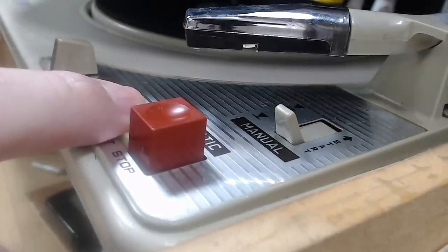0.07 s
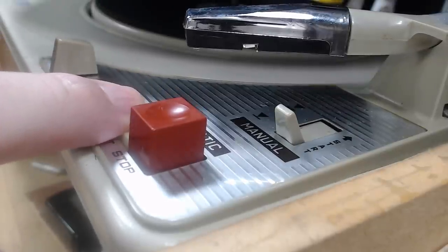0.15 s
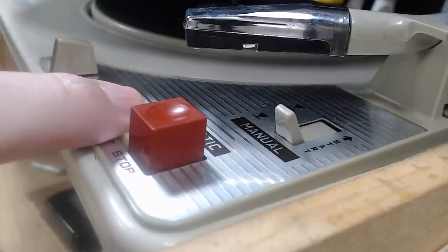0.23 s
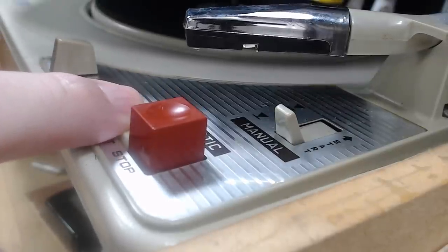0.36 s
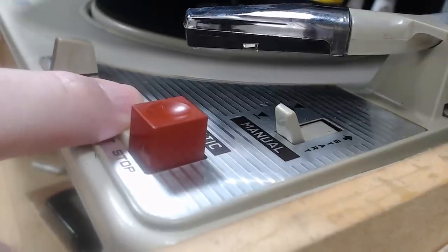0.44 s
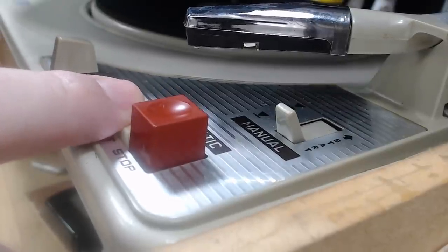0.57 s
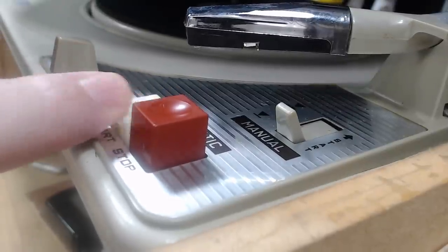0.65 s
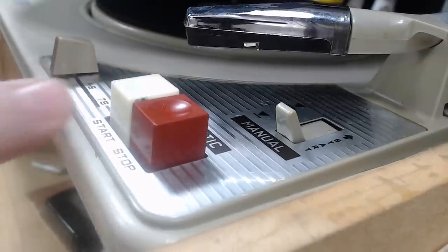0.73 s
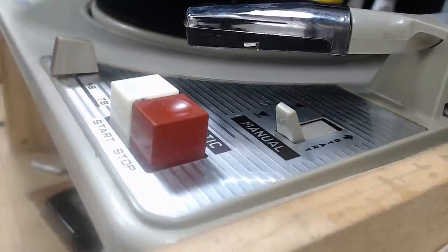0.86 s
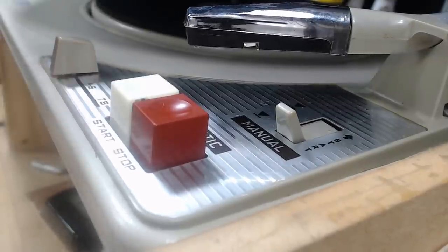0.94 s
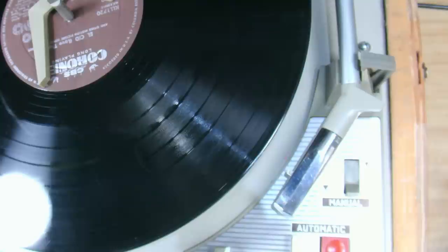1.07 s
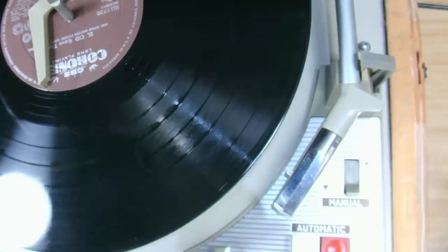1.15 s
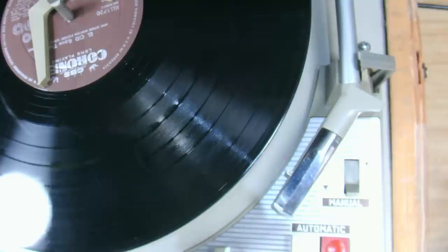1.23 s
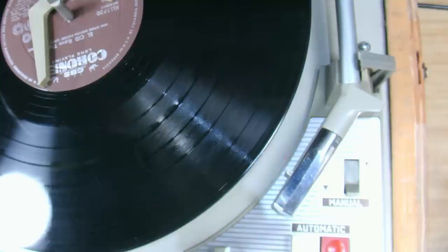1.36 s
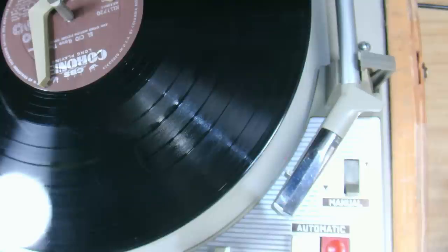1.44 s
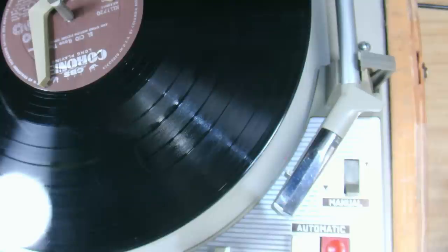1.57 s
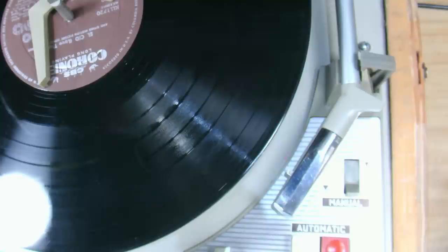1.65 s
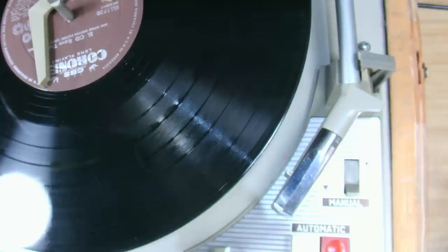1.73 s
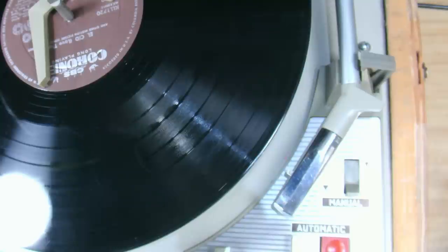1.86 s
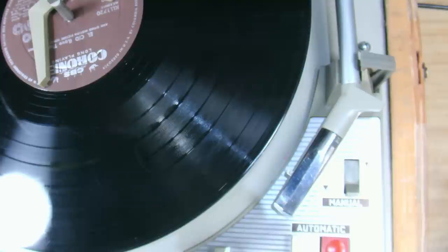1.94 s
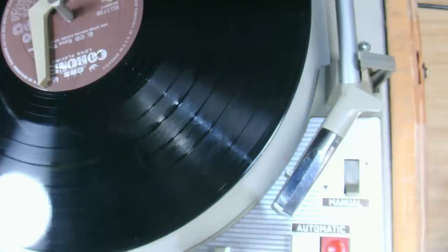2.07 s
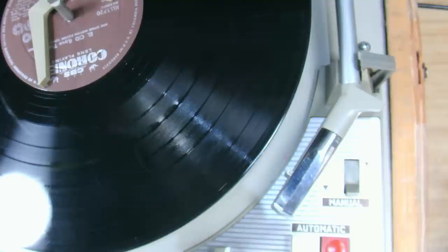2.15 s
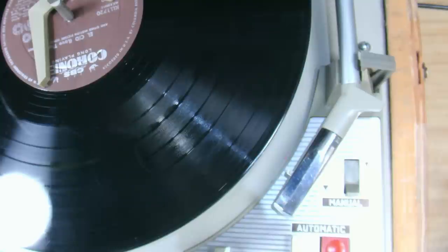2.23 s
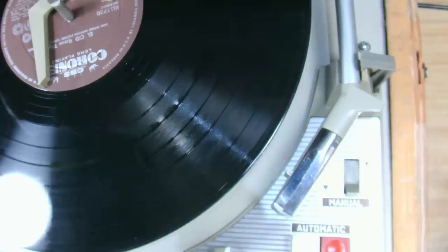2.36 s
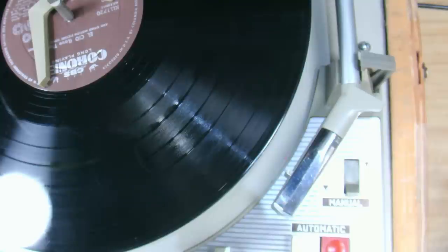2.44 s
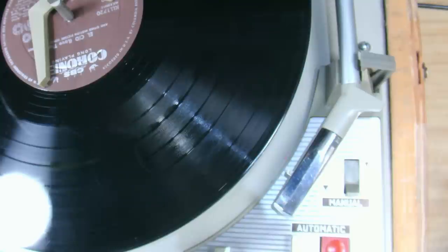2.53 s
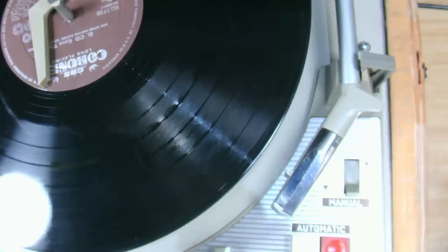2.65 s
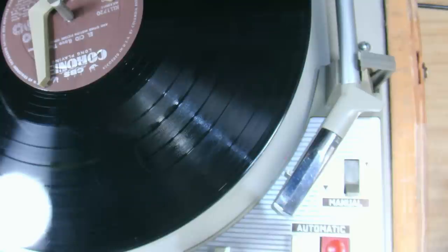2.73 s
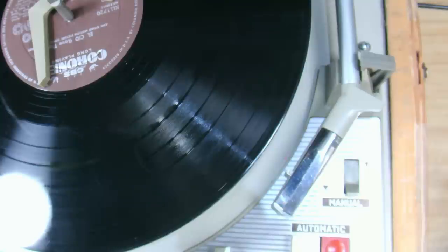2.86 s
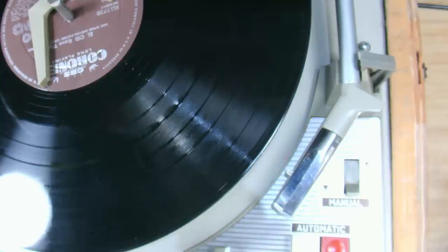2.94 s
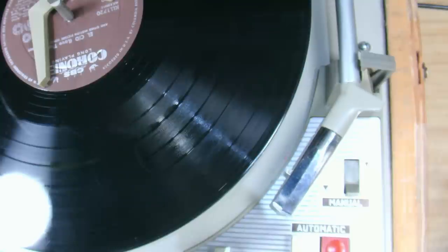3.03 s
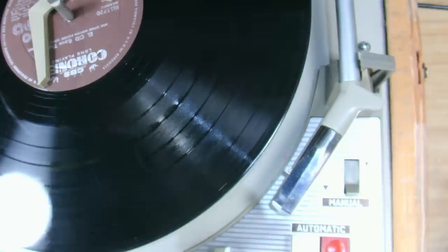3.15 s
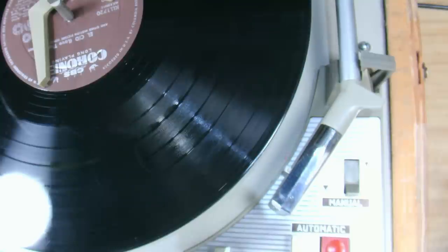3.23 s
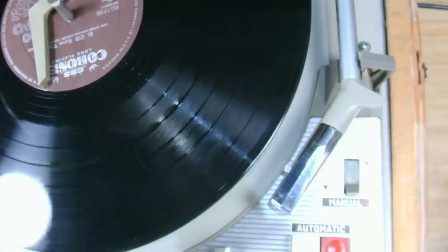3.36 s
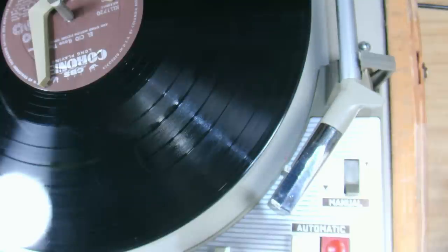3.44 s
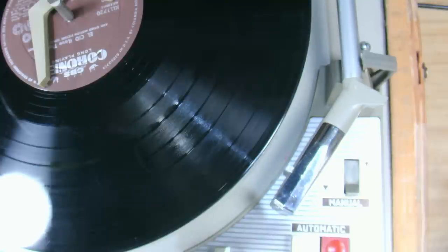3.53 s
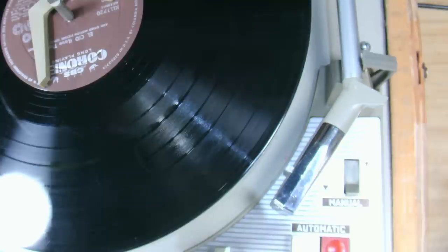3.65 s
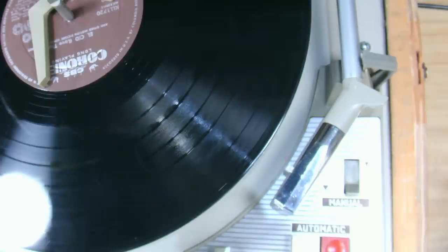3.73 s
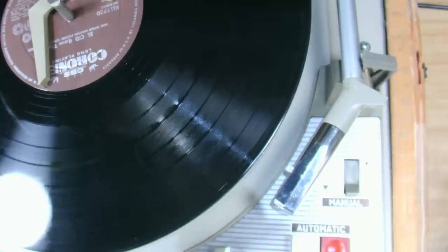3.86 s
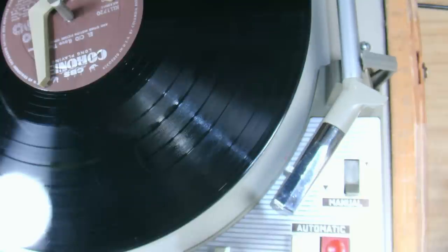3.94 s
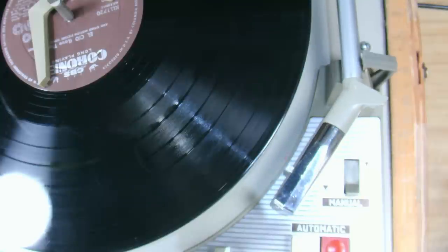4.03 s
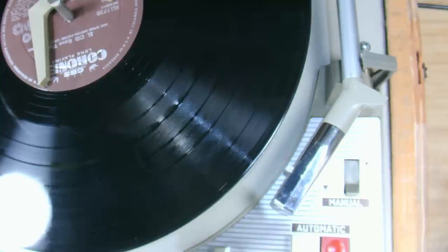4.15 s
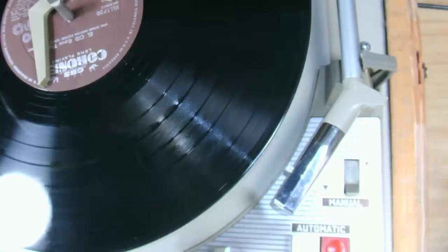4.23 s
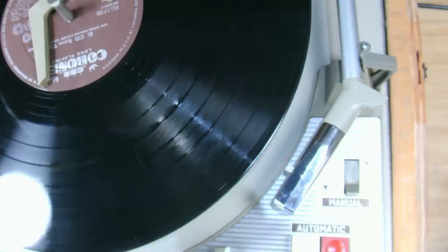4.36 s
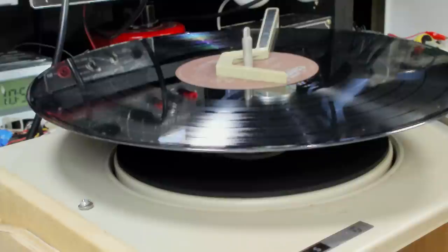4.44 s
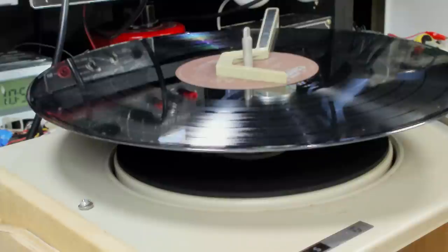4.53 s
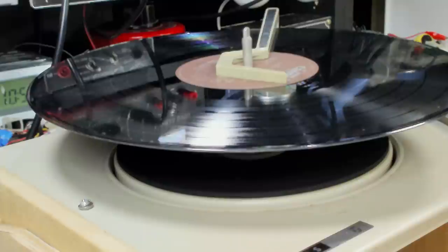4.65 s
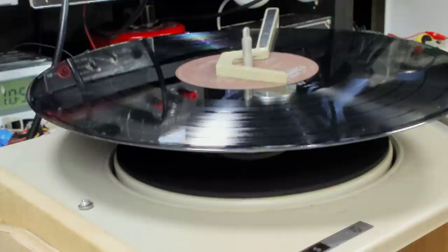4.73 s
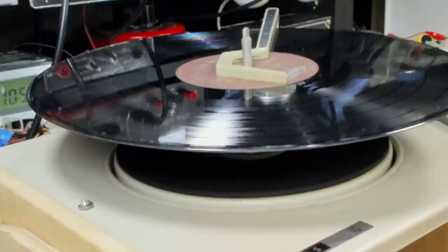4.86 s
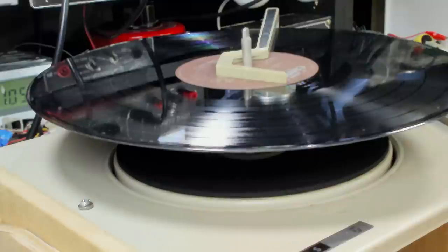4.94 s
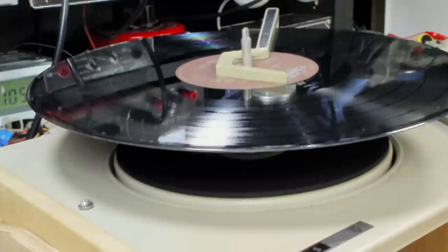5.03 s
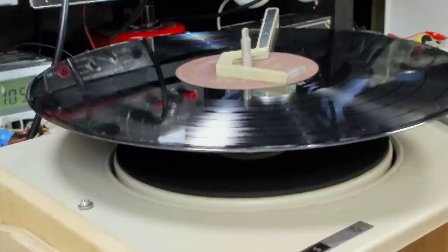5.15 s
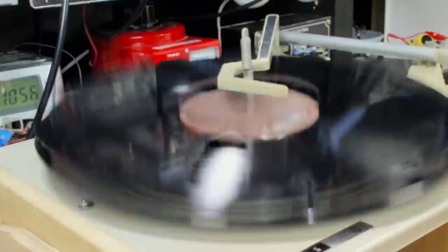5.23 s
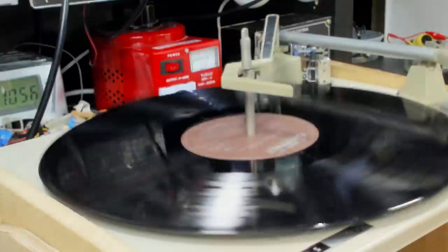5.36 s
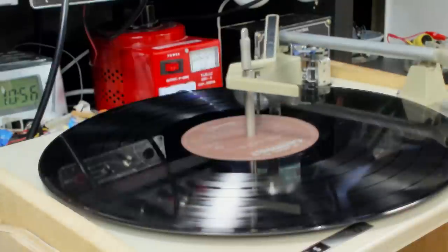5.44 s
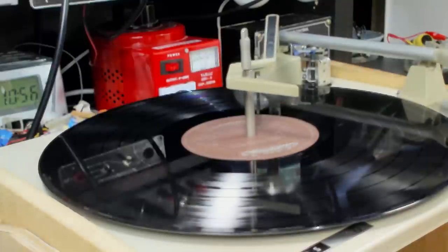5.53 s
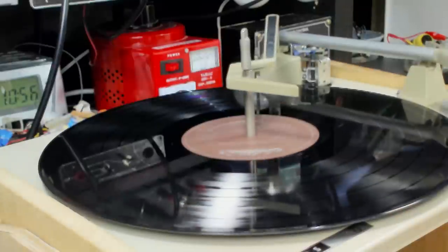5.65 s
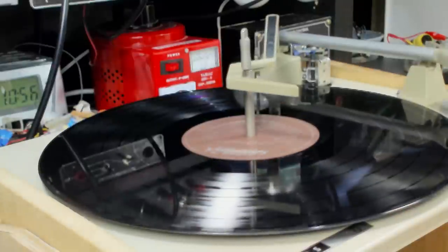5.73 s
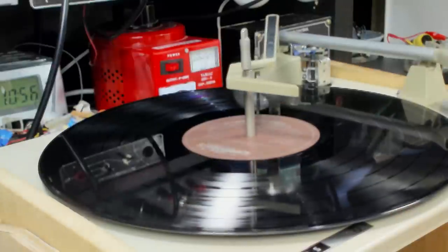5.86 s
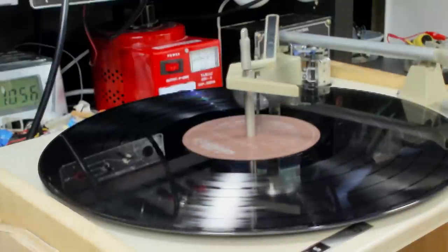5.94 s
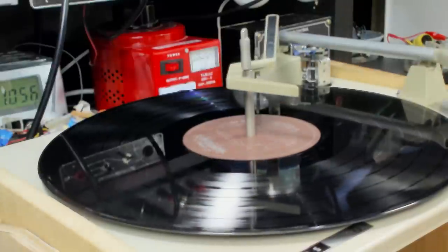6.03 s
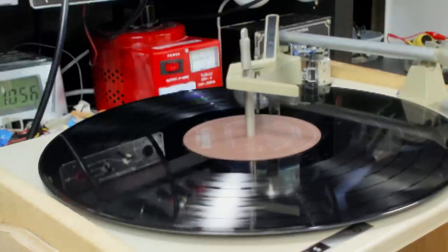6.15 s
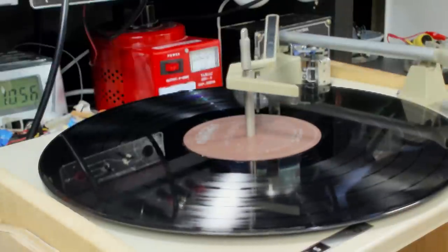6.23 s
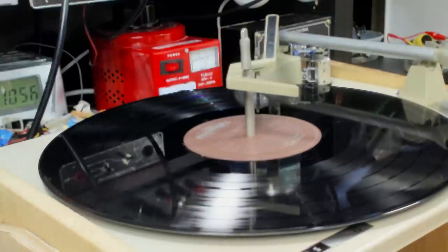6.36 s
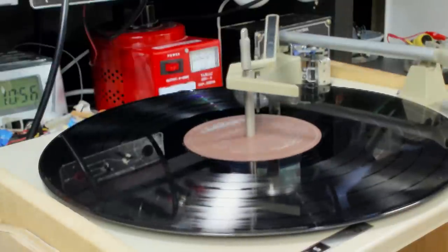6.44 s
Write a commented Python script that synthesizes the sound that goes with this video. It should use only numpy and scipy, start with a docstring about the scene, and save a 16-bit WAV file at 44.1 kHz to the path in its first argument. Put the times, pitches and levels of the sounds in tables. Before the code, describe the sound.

Close microphone in a small, fairly dry room, with steady low motor rumble, faint whirr, hiss and unsteady deep bass throughout. From 0.1 to 0.6 s, soft hollow plastic knocks come as a key is pressed. At 0.7 s it releases with a loud crisp clack, followed by more at 0.8 s; the motor briefly whirrs louder, and a lever slides with faint grainy friction until about 1.25 s. Then mostly quiet running with tiny cam scuffs, a bright click near 2.45 s, and faint dull taps at 3.1 and 3.65 s. A clearer click comes at 4.8 s, then sharp latch clicks at 5.2 s. From 5.28 to 5.47 s the record slaps the platter in rapid clacks and bounces, loudest around 5.4 s, boomy and overloaded. A low shudder dies quickly; a thin wavering mid-pitched metallic ring fades, with tiny ticks until 6.5 s.

```python
"""A small room, close microphone: a finger presses the start key of a record changer.
Keys, levers and cam tick as short rattles of tiny impacts; a lever slides with grainy friction.
A latch lets the record fall down the spindle: it slaps the platter with sharp clacks and bounces, as pushes
on cabinet modes, overloads the microphone input and leaves the metal platter ringing in decaying sines.
Deep noise near 29 Hz wavers by chance; motor rumble, whirr and hiss are coloured noise behind it all."""
import sys
import numpy as np
from scipy import signal
from scipy.fft import rfft, irfft
from scipy.io import wavfile
from scipy.ndimage import uniform_filter1d

SR = 44100
rng = np.random.default_rng(int(sys.argv[2]) if len(sys.argv) > 2 else 0)


def wav_out(sig):
    """Save sig, one row per channel (or a flat mono array), as 16-bit PCM at SR to the path in sys.argv[1]."""
    wavfile.write(sys.argv[1], SR, np.round(np.clip(np.atleast_2d(sig).T, -1, 1) * 32767).astype(np.int16))


N = 286297  # length in samples, about 6.5 s


def from_db(db):
    """Decibels to gain."""
    return 10 ** (np.asarray(db) / 20)


def rms_one(x):
    """Scale to unit rms."""
    return x / np.sqrt(np.mean(x ** 2) + 1e-20)


def peak_one(x):
    """Scale to unit peak."""
    return x / np.abs(x).max()


def in_time(rows, outside=None):
    """Columns of a curve table, sample by sample; the first column is the time in s."""
    times_s, *columns = np.transpose(rows)
    return [np.interp(np.arange(N) / SR, times_s, column, outside, outside) for column in columns]


def band(x, low_hz, high_hz):
    """Band-pass."""
    return signal.sosfilt(signal.butter(2, [low_hz, high_hz], "band", fs=SR, output="sos"), x)


def resonance(x, hz, width_hz):
    """Two-pole resonance with gain 1 at its centre."""
    r = np.exp(-np.pi * width_hz / SR)
    zeros = np.array([1, 0, -1]) * (1 - r * r) / 2
    return signal.lfilter(zeros, [1, -2 * r * np.cos(2 * np.pi * hz / SR), r * r], x)


def double_resonance(x, hz, width_hz):
    """The same resonance twice in a row, for steeper sides."""
    return resonance(resonance(x, hz, width_hz), hz, width_hz)


def ring(clicks, hz, t60_s):
    """A damped mode: a unit click sets a sine of height 1 ringing."""
    r, w = from_db(-60 / (t60_s * SR)), 2 * np.pi * hz / SR
    return signal.lfilter([0, np.sin(w)], [1, -2 * r * np.cos(w), r * r], clicks + 1e-18)


def swells(rows, rise_s):
    """Power envelope of (start_s, level_db, t60_s) events, each dying evenly behind a smoothed onset."""
    t = np.arange(N) / SR
    dying = sum(from_db(2 * (db - 60 * np.maximum(t - s, 0) / t60_s)) * (t >= s) for s, db, t60_s in rows)
    smooth = np.exp(-1 / (rise_s * SR))
    return signal.lfilter([1 - smooth], [1, -smooth], dying + 1e-18)


# the record touches the platter: start_s [s], level_db [dB, drive of the push]
LANDING = [(5.279, -21.5), (5.295, -17), (5.315, -14.5), (5.327, -10.5), (5.348, -18.5), (5.386, -6),
           (5.391, -2.5), (5.401, -1), (5.407, -3.5), (5.42, -15.5), (5.461, -14.5), (5.473, -13.5)]
# modes of platter mat and cabinet: pitch_hz [Hz], level_db [dB], t60_s [s, capped at LONGEST_THUD_S]
PLINTH = [(65.4, -4.5, 0.1), (118.7, -4.5, 0.095), (182, -14.5, 0.081), (253.6, -6.5, 0.099),
          (307, -14.5, 0.13), (411, -11, 0.031), (456, -26, .05), (640, -16.5, 0.095), (714, -9, 0.041),
          (791, -10, 0.073), (836, -4, 0.025), (915, -9, 0.034), (1038, -11, 0.076), (1193, -8.5, 0.029),
          (1470, -15.5, 0.059), (1670, -12.5, 0.018), (2100, -15.5, .02)]
# long rings of the platter: pitch_hz [Hz], level_db [dB], t60_s [s]
PLATTER = [(388, -47, 2.5), (1820, -59, .8)]
FIRST_SOFT_MS, SOFT_DOUBLES_S = 0.25, 0.07  # contact softens as the record comes to lie flat
LONGEST_THUD_S = .09
STRENGTH_SPREAD_DB = 3.26  # random spread over touches and modes


def landing():
    """Soft pushes strike the cabinet modes, each with its own strength; the hardest rings the platter."""
    pushes = np.zeros((len(PLINTH), N))
    strengths_db = rng.normal(0, STRENGTH_SPREAD_DB, (len(LANDING), len(PLINTH)))
    signs = rng.choice([-1, 1], strengths_db.shape)
    first_s = LANDING[0][0]
    for (start_s, level_db), strength_db, sign in zip(LANDING, strengths_db, signs):
        soft_ms = FIRST_SOFT_MS * 2 ** ((start_s - first_s) / SOFT_DOUBLES_S)
        push = np.hanning(round(soft_ms * SR / 1000) + 2)
        drives = sign * from_db(level_db + strength_db)
        pushes[:, round(start_s * SR):][:, :len(push)] += np.outer(drives, push / push.sum())
    thud = sum(from_db(db) * ring(push, hz, min(t60_s, LONGEST_THUD_S))
               for push, (hz, db, t60_s) in zip(pushes, PLINTH))
    hardest_s, _ = max(LANDING, key=lambda row: row[1])
    hardest = np.zeros(N)
    hardest[round(hardest_s * SR)] = 1
    return thud + sum(from_db(db) * ring(hardest, hz, t60_s) for hz, db, t60_s in PLATTER)


SHUDDER_DB = -12  # relative to the drive of each touch
SHUDDER_RISE_S, SHUDDER_T60_S = 0.008, 0.16
SHUDDER_LOW_HZ, SHUDDER_TOP_HZ = 45, 410


def shudder():
    """The record flaps on its air cushion and the cabinet shudders: low noise stirred by each touch."""
    touches = [(start_s, level_db, SHUDDER_T60_S) for start_s, level_db in LANDING]
    stirred = np.sqrt(swells(touches, SHUDDER_RISE_S))
    rumbling = rms_one(band(rng.standard_normal(N), SHUDDER_LOW_HZ, SHUDDER_TOP_HZ))
    return from_db(SHUDDER_DB) * stirred * rumbling


# brief dips of the strongest ring, perhaps as its quiet lobes turn past:
# centre_s [s], depth_db [dB], half_width_s [s, where the depth is down to 1/e]
RING_DIPS = [(5.6, 16, 0.04), (5.675, 19, 0.031), (6.09, 10, 0.025), (6.24, 8, 0.03)]
RING_HZ, RING_START_S, RING_T60_S = 950, 5.45, 2.37
RING_DB = -38.5  # rms at the start, before the dips
WAVER_HZ, WAVER_PER_S, WAVER_TOP_S = 3.5, 3.1, 5.8  # pitch swing to either side, rate, a moment of highest pitch


def turning_ring():
    """The strongest mode of the platter: a slightly wavering sine, dying evenly except for its dips."""
    t = np.arange(N) / SR
    dips_db = sum(depth_db * np.exp(-((t - s) / half_s) ** 2) for s, depth_db, half_s in RING_DIPS)
    level_db = RING_DB - 60 * (t - RING_START_S) / RING_T60_S - dips_db
    hz = RING_HZ + WAVER_HZ * np.cos(2 * np.pi * WAVER_PER_S * (t - WAVER_TOP_S))
    tone = np.sqrt(2) * np.sin(2 * np.pi * np.cumsum(hz) / SR)
    return from_db(level_db) * (t > RING_START_S) * tone


# contacts of keys, levers and latch, and sharp clacks of the landing record; levels before the deck's ring:
# start_s [s], knock_db [dB peak, low range and hollow ring], rattle_db [dB peak, ranges above 1.8 kHz],
# bright_db [dB gained per treble range], pitch_hz [Hz, of the hollow ring],
# length_ms [ms, decay time of the rattle]
CONTACTS = [(0.123, -47.5, -62.5, -6, 1520, 17), (0.29, -31, -60.5, -8.5, 810, 4.3),
            (0.299, -38.5, -65, -6, 1194, 2.8), (0.349, -36.5, -61, -4, 770, 6.4),
            (0.386, -31, -66, -5, 723, 5.5), (0.423, -26, -46, -1, 443, 8.6),
            (0.432, -36, -56.5, -12, 1300, 11), (0.500, -41.5, -57.5, -1.5, 730, 2.4),
            (0.512, -58, -64, -5, 1220, 5.6), (0.562, -33.5, -61.5, -8.5, 663, 9.9),
            (0.694, -16.5, -17, 3, 640, 7.2), (0.804, -18.5, -30, 5, 404, 7.8),
            (0.815, -23.5, -35, -3, 1680, 16), (2.434, -44.5, -63, -4, 1900, 37),
            (2.456, -28, -34.5, 6.5, 1476, 7.8), (2.461, -30.5, -43, 3, 680, 6.5),
            (2.988, -53, -71, -7, 500.6, 6.5), (3.101, -42, -71, 2, 422, 7.2),
            (3.330, -49, -63.5, 7, 758, 5.6), (3.657, -31, -63, 0, 423, 7.7),
            (3.678, -40, -77, -5, 600, 9.4), (3.692, -50, -78, -5.5, 990, 3),
            (3.723, -56, -83, -3, 2620, 2.7), (4.674, -44.5, -60.5, -6, 497, 20),
            (4.773, -42.5, -50, -7.5, 1410, 25), (4.814, -27.5, -37, 7, 714, 11.8),
            (5.172, -50.5, -61, -4, 1400, 11.6), (5.202, -33.5, -34, 6, 1510, 7.2),
            (5.217, -25, -26.5, 4, 1140, 10.3), (5.296, -16, -48.5, -11, 830, 11),
            (5.312, -15.5, -26, -4, 1440, 2.3), (5.326, -13.5, -17.5, 0, 2520, 3.1),
            (5.343, -12.5, -31, 7, 1760, 13), (5.378, -14.5, -33, 0, 754, 24),
            (5.403, -11.5, -32.5, 4.5, 1675, 5.36), (5.417, -17, -34, 2, 940, 15),
            (5.662, -39, -71, -6, 430, 8.5), (5.960, -51.5, -61.5, -4, 1200, 8),
            (6.065, -58, -68.5, -6, 647, 9.3), (6.155, -51, -69, -7, 1200, 11),
            (6.293, -51, -57.5, 12.5, 1740, 6.9), (6.448, -51, -65, -2.5, 1500, 16)]
# reflections of each contact, one row per range from low to high: level_db [dB under the rattle], t60_s [s]
TAILS = [(-10.5, 0.43), (-10.5, 0.35), (-11.5, 0.28), (-18, 0.34)]
# what the deck rings with: pitch_hz [Hz], width_hz [Hz], level_db [dB, relative to the direct contact sound]
DECK = [(3900, 500, 4), (4860, 400, 5), (6280, 500, 1), (7100, 600, 6), (8380, 700, 2)]
RANGES_HZ = [(130, 1800), (1800, 5000), (5000, 10000), (10000, 16500)]
RISE_MS, RISE_SLOWS_MS_PER_DB = 0.15, 0.18  # rise of a full-scale knock; fainter ones start more gently
TICK_LIFT_DB = 1  # the 5-10 kHz range stands out of the rattle
KNOCK_Q = 5.5  # pitch over width of each of the two passes of the hollow ring
HOLLOW_MS = 4.1  # in rattles shorter than this the knock part is all hollow ring
TAIL_RISE_MS = 1.9


def contacts():
    """Each contact is a short rattle of tiny impacts with a diffuse tail, sounding through the deck."""
    out, t = np.zeros(N + SR), np.arange(SR // 5) / SR
    tail_rise = 1 - np.exp(-1000 * t / TAIL_RISE_MS)
    tails = [from_db(db - 60 * t / t60_s) * tail_rise for db, t60_s in TAILS]
    for start_s, knock_db, rattle_db, bright_db, pitch_hz, length_ms in CONTACTS:
        peaks_db = [knock_db, rattle_db - bright_db, rattle_db + TICK_LIFT_DB, rattle_db + bright_db]
        rise_ms = RISE_MS - RISE_SLOWS_MS_PER_DB * knock_db
        shape = peak_one((1 - np.exp(-1000 * t / rise_ms)) * np.exp(-1000 * t / length_ms))
        # uneven loudness makes the noise grainy; one row per range and one for the hollow ring
        impacts = rng.standard_normal((5, len(t))) * from_db(1.5 * rng.standard_normal(len(t)))
        parts = []
        for noise, tail, edges_hz in zip(impacts, tails, RANGES_HZ):
            rattle = noise * np.hypot(shape, tail)
            parts.append(peak_one(band(band(rattle, *edges_hz), *edges_hz)))
        # the struck hollow part rings at its own pitch, the more so the shorter the rattle
        hollow = peak_one(double_resonance(impacts[4] * shape, pitch_hz, pitch_hz / KNOCK_Q))
        share = min(HOLLOW_MS / length_ms, 1)
        parts[0] = share * hollow + (1 - share) * parts[0]
        out[round(start_s * SR):][:len(t)] += sum(from_db(db) * part for part, db in zip(parts, peaks_db))
    direct = out[:N] + 1e-18
    return direct + sum(from_db(db) * resonance(direct, hz, width_hz) for hz, width_hz, db in DECK)


# a lever slides after the key comes up: time_s [s], whine_db [dB rms], rub_db [dB rms]
SLIDE = [(.87, -78, -53), (.91, -66, -73), (.96, -59, -64), (1.05, -59.5, -62.5), (1.11, -65, -61),
         (1.14, -77, -62), (1.24, -71, -66), (1.27, -90, -75)]
# resonances of the lever: pitch_hz [Hz], width_hz [Hz], level_db [dB, relative to each other]
SLIDE_RINGS = [(2500, 550, 18.5), (3870, 630, 0), (4585, 540, -13)]
WHINE_HZ, WHINE_WIDTH_HZ = 2880, 190  # width of each of two passes


def slide():
    """Grainy friction: a narrow whine and a broader rub in the resonances of the lever."""
    grains = rng.standard_normal(N) * from_db(3 * rng.standard_normal(N))
    whine = double_resonance(grains, WHINE_HZ, WHINE_WIDTH_HZ)
    rub = sum(from_db(db) * resonance(grains, hz, width_hz) for hz, width_hz, db in SLIDE_RINGS)
    whine_db, rub_db = in_time(SLIDE, outside=-120)
    return from_db(whine_db) * rms_one(whine) + from_db(rub_db) * rms_one(rub)


CAM_TICKS_PER_S, CAM_TICK_DB, CAM_TICK_MS = 5.0, -72.5, 10.4  # mean rate, typical level, decay time
CAM_HZ, CAM_WIDTH_HZ = 3700, 3600


def cam_ticks():
    """Faint scuffs of the turning cam at random moments: puffs of noise in one broad resonance."""
    starts = (rng.random(N) < CAM_TICKS_PER_S / SR) * from_db(1.25 * rng.standard_normal(N))
    decay = np.exp(-1000 / (CAM_TICK_MS * SR))
    puffs = signal.lfilter([1], [1, -decay], starts + 1e-18)
    scuff = rms_one(resonance(rng.standard_normal(N), CAM_HZ, CAM_WIDTH_HZ))
    return from_db(CAM_TICK_DB) * puffs * scuff


# a few swells of the deep noise: start_s [s], level_db [dB, before the rise smooths it], t60_s [s]
DEEP_SWELLS = [(0.45, -36.5, 1.6), (1.08, -41, .6), (1.22, -34, 1.4), (1.7, -43, 1.), (5.27, -30.5, .8),
               (5.38, -17, .75), (5.82, -35.5, 1.2)]
DEEP_HZ, DEEP_WIDTH_HZ = 28.6, 12.3  # width of each of two passes
DEEP_RISE_S, DEEP_STEADY_DB = 0.043, -49


def deep_noise():
    """Deep low noise near 29 Hz that wavers by chance, with a few swells."""
    noise = rng.standard_normal((2, N + SR))
    steady, swelling = double_resonance(noise, DEEP_HZ, DEEP_WIDTH_HZ)[:, SR:]  # skip the filter's build-up
    evened = swelling / np.sqrt(uniform_filter1d(swelling ** 2, size=SR // 8))
    return from_db(DEEP_STEADY_DB) * rms_one(steady) + np.sqrt(swells(DEEP_SWELLS, DEEP_RISE_S)) * evened


ROOM_T60_S, ROOM_DB = 0.13, -12
ROOM_LOW_HZ, ROOM_DULL_HZ = 300, 3000


def room(x):
    """Dense reflections that die away, duller and thinner than the direct sound."""
    t = np.arange(SR // 2) / SR
    dying = rng.standard_normal(len(t)) * from_db(-60 * t / ROOM_T60_S)
    echoes = band(dying * (t > .004), ROOM_LOW_HZ, ROOM_DULL_HZ)  # first reflection after 4 ms
    return from_db(ROOM_DB) * signal.fftconvolve(x, echoes / np.sqrt(np.sum(echoes ** 2)))[:N]


# colour of motor, room tone and microphone hiss: pitch_hz [Hz], level_db [dB per Hz, relative within a range]
COLOUR = [(26, -32), (45, -2), (65, -6.5), (112, -2), (271, -12), (299, -7), (321, -13.5), (363, -7),
          (539, -19), (760, -21.5), (996, -32), (1180, -26.5), (1800, -34.5), (14500, -51.5),
          (16000, -52.5)]
# motor load: time_s [s], rumble_db [dB rms], whirr_db [dB rms]
MOTOR = [(0, -46, -60.5), (.75, -45, -51), (1.0, -44.5, -57.5), (1.3, -48, -60.5), (4.3, -47.5, -60.5),
         (6.49, -47.5, -60.5)]
HISS_DB = -69.5  # rms
RUMBLE_TOP_HZ, WHIRR_TOP_HZ = 550, 2200


def background():
    """Coloured noise in three ranges: rumble and whirr follow the motor load, the hiss is steady."""
    hz = np.fft.rfftfreq(N, 1 / SR)
    colour_hz, colour_db = np.array(COLOUR).T
    gain = np.r_[0, from_db(np.interp(np.log(hz[1:]), np.log(colour_hz), colour_db))]
    low = 1 / (1 + (hz / RUMBLE_TOP_HZ) ** 4)
    below_hiss = 1 / (1 + (hz / WHIRR_TOP_HZ) ** 4)
    rumble, whirr, hiss = [rms_one(irfft(rfft(rng.standard_normal(N)) * gain * share, N))
                           for share in (low, below_hiss - low, 1 - below_hiss)]
    rumble_db, whirr_db = in_time(MOTOR)
    return from_db(rumble_db) * rumble + from_db(whirr_db) * whirr + from_db(HISS_DB) * hiss


def scene():
    """The falling record in its room, the contacts and mechanism, the deep noise and the background."""
    thud = landing()
    drop = thud + room(thud) + shudder() + turning_ring()
    mechanism = contacts() + slide() + cam_ticks()
    return (drop + mechanism + deep_noise() + background())[None]


MIC_LOW_HZ, CUTOFF_HZ = 26.54, 16700
CLIP_LEVEL = .99  # full scale is 1


def record(dry):
    """The close microphone drops the deepest bass, the slap overloads the input, the top is cut."""
    dry = signal.sosfilt(signal.butter(2, MIC_LOW_HZ, "high", fs=SR, output="sos"), dry)
    clipped = dry / (1 + np.abs(dry / CLIP_LEVEL) ** 8) ** (1 / 8)  # a slightly rounded clip
    return signal.sosfilt(signal.cheby2(12, 60, CUTOFF_HZ, fs=SR, output="sos"), clipped)


dry = scene()
out = record(dry)
wav_out(out)
```